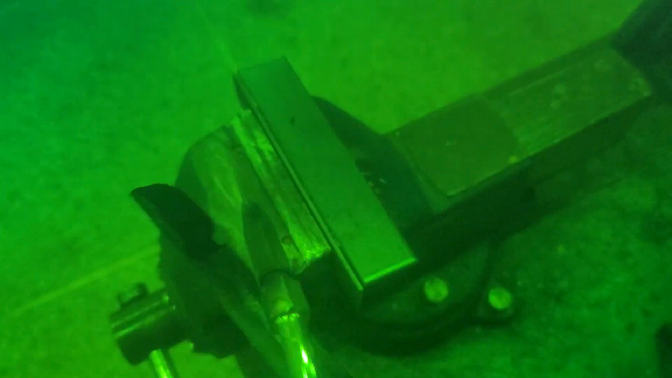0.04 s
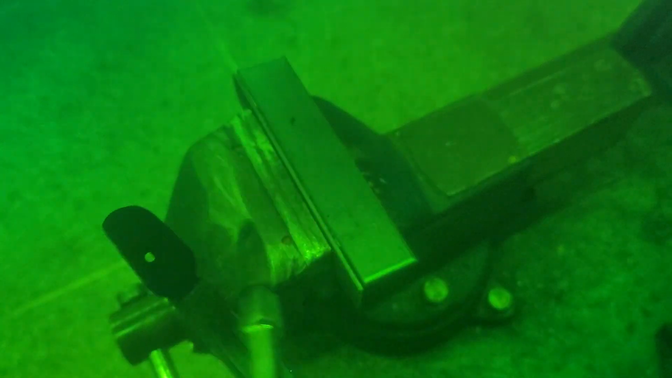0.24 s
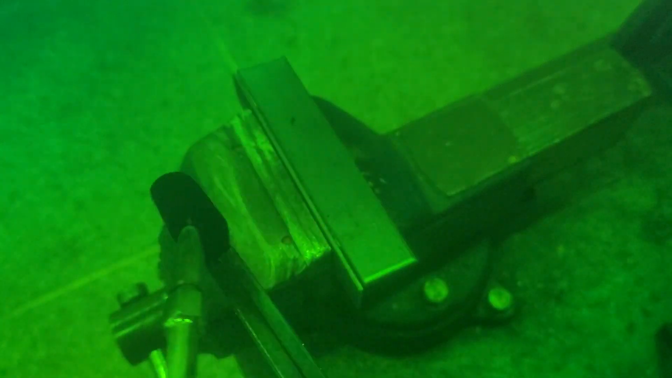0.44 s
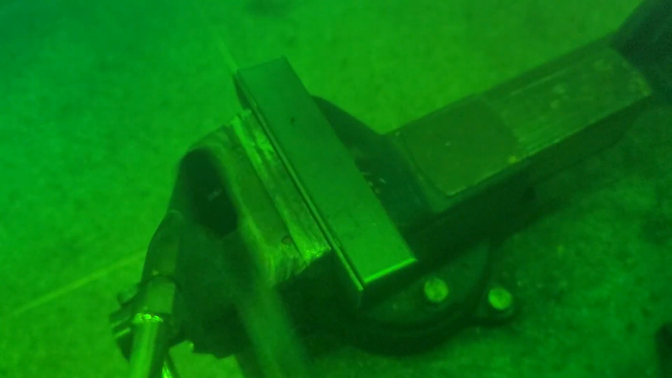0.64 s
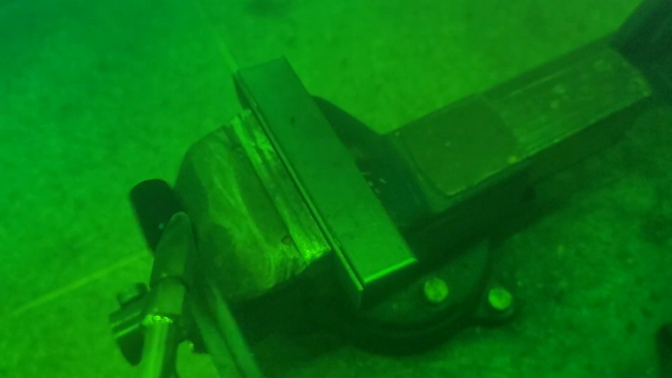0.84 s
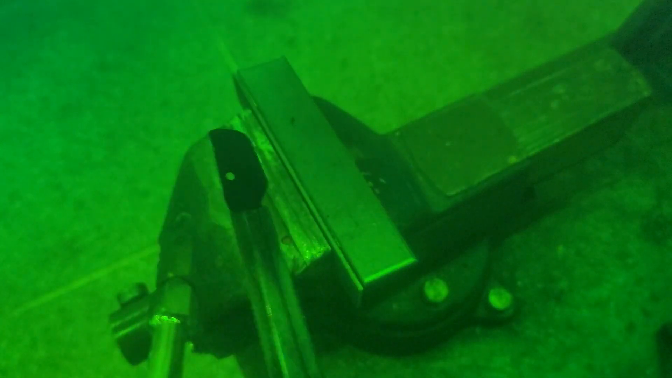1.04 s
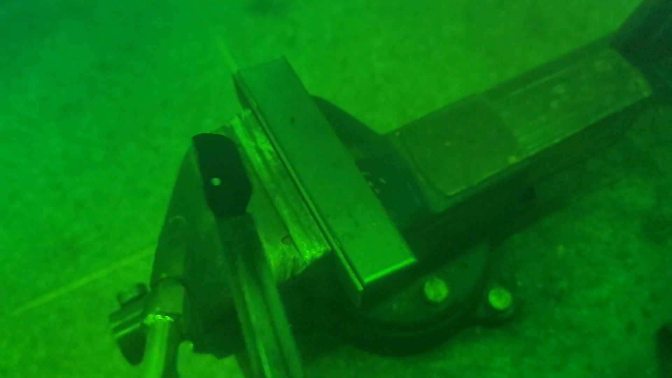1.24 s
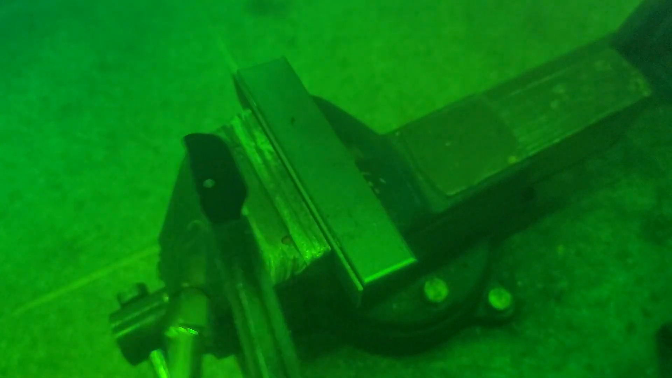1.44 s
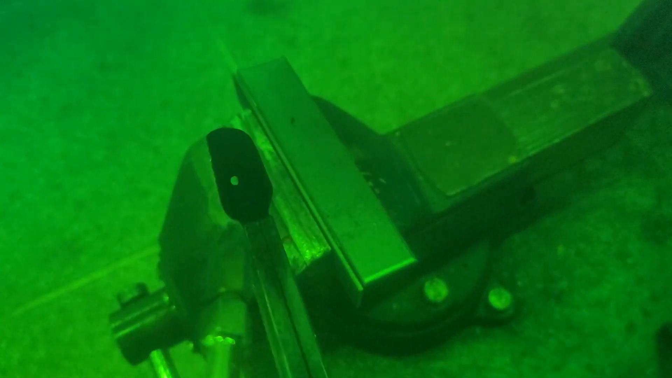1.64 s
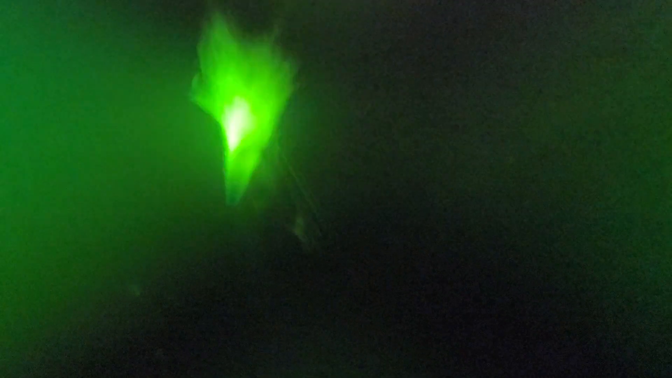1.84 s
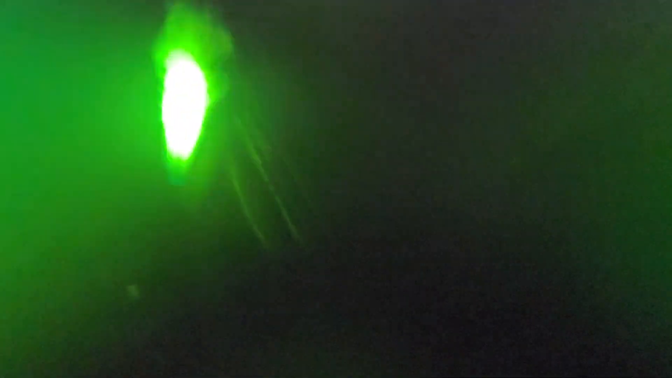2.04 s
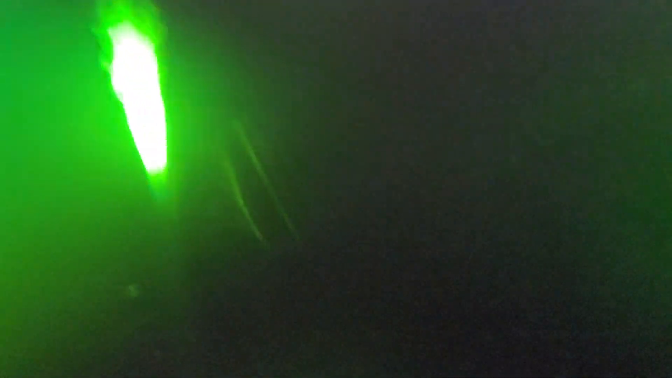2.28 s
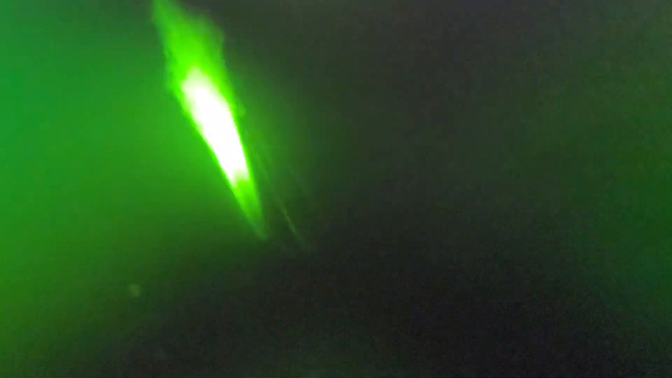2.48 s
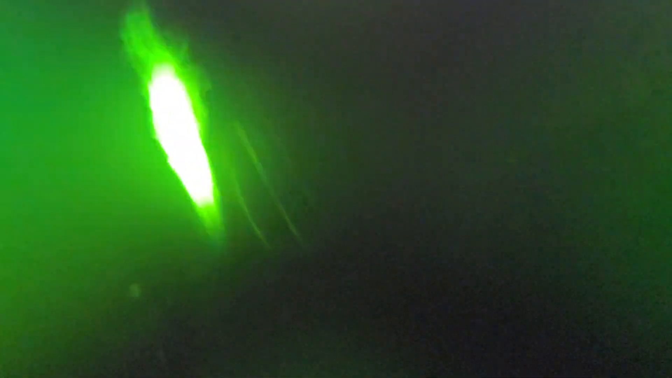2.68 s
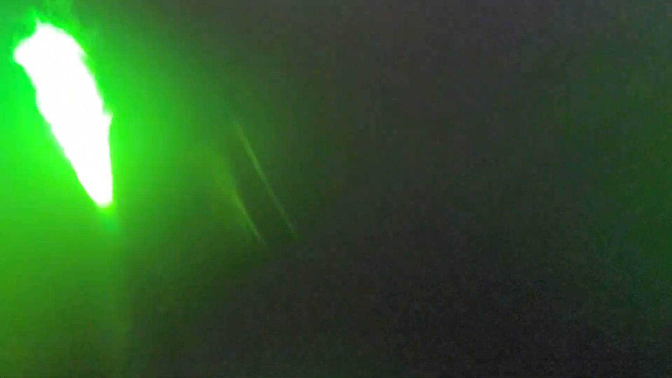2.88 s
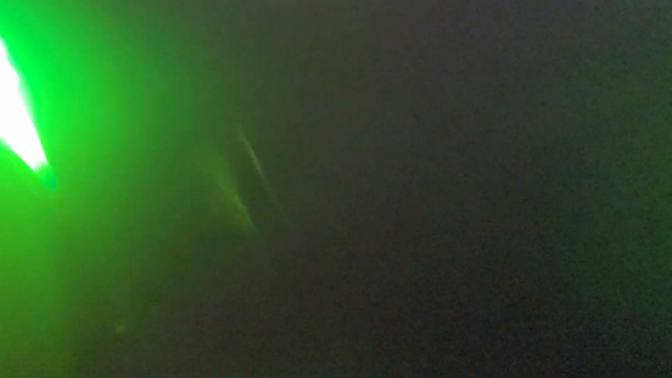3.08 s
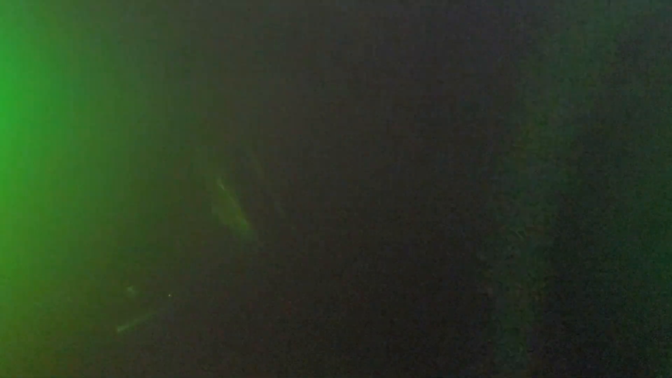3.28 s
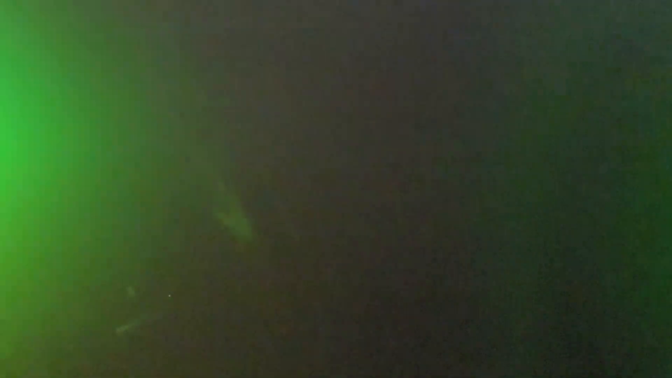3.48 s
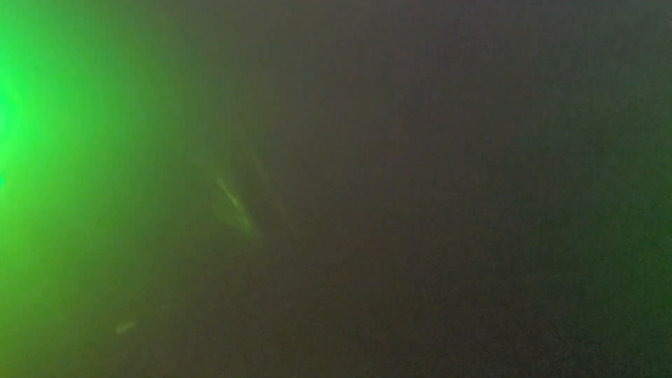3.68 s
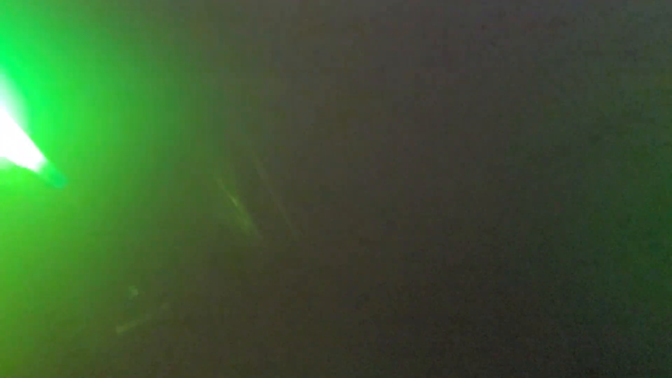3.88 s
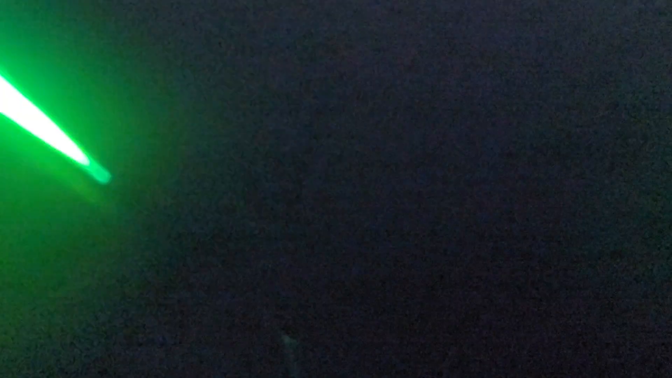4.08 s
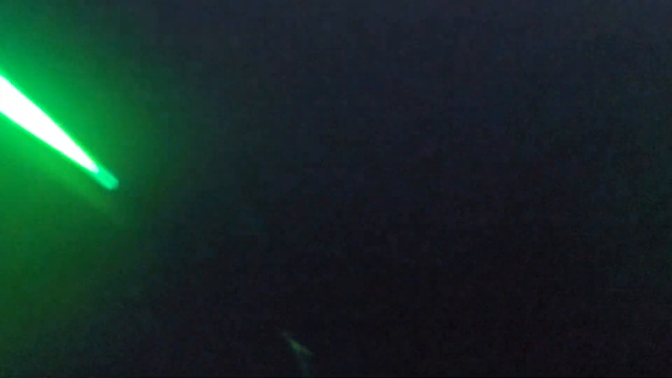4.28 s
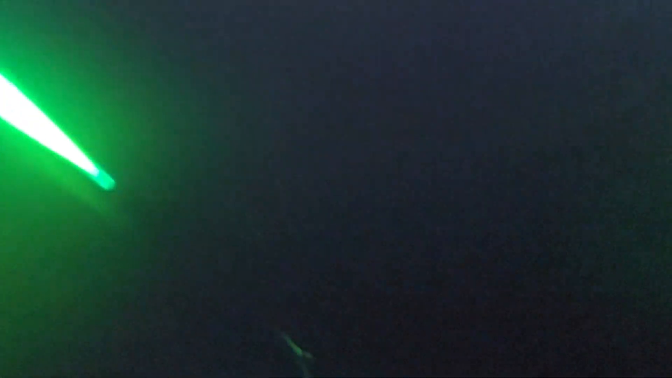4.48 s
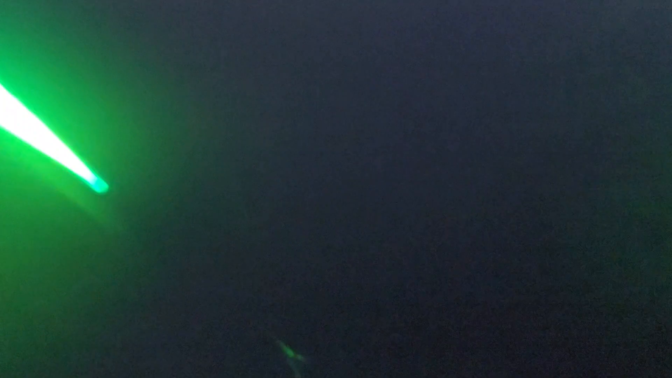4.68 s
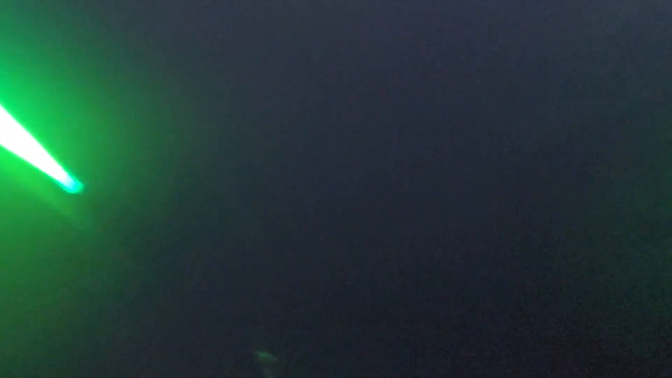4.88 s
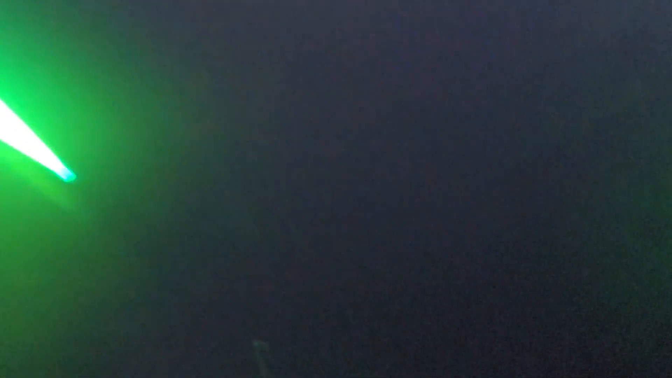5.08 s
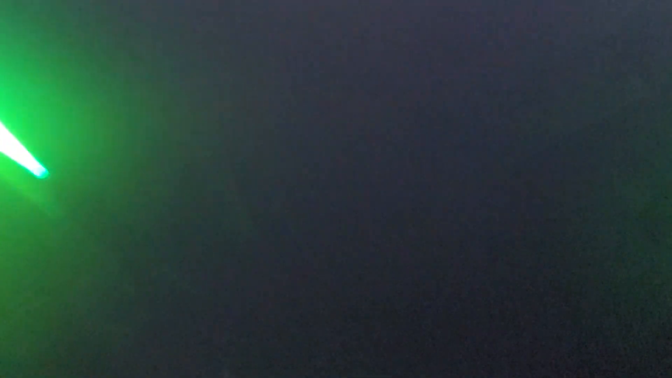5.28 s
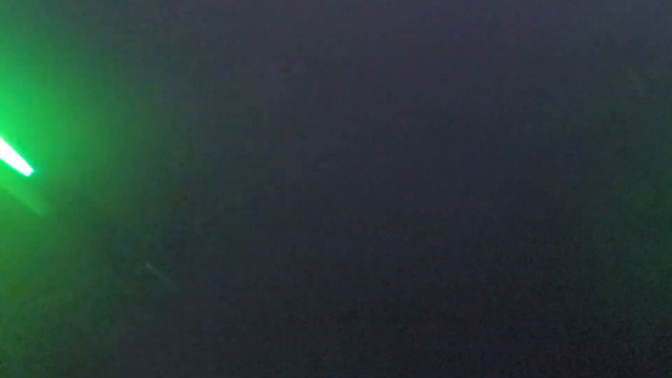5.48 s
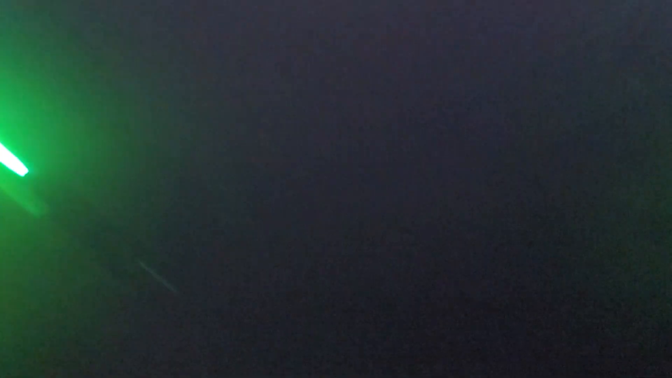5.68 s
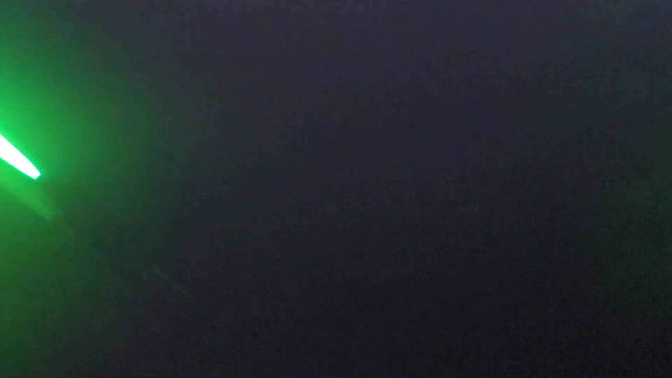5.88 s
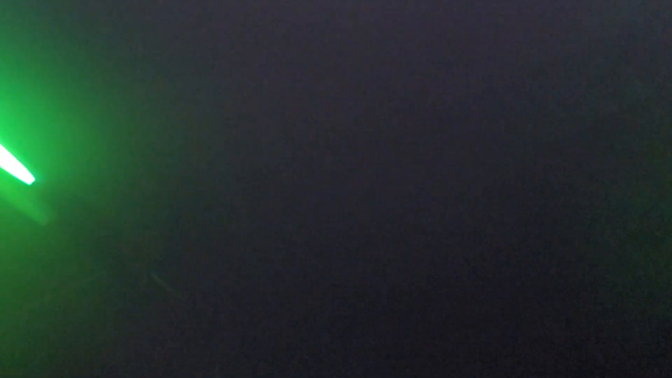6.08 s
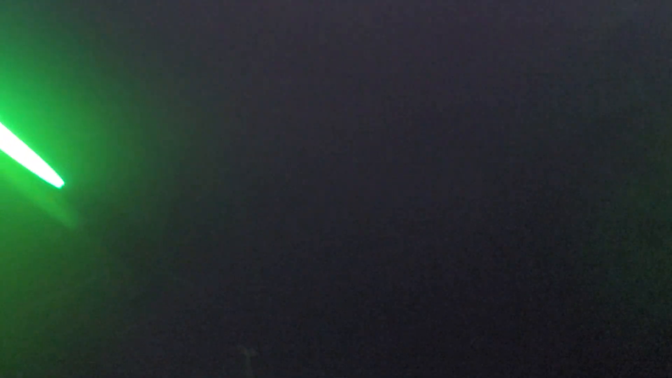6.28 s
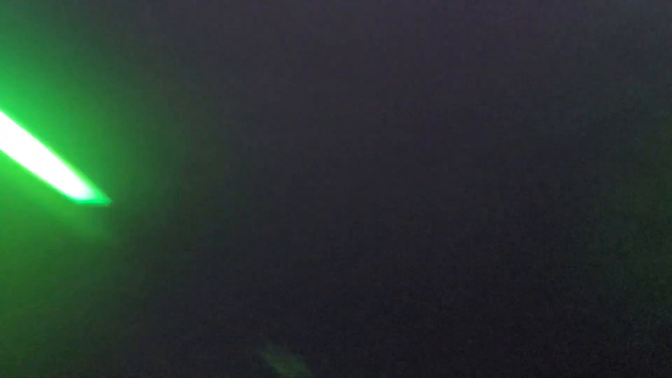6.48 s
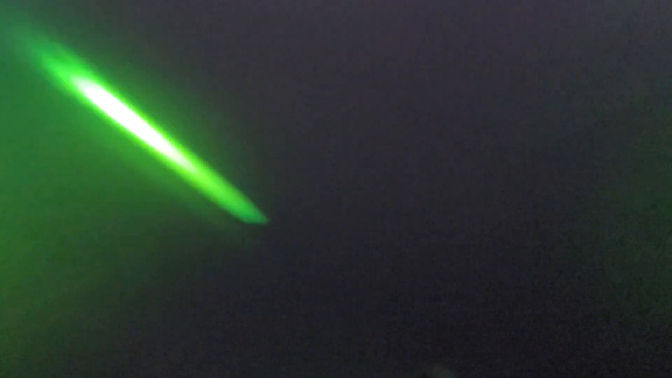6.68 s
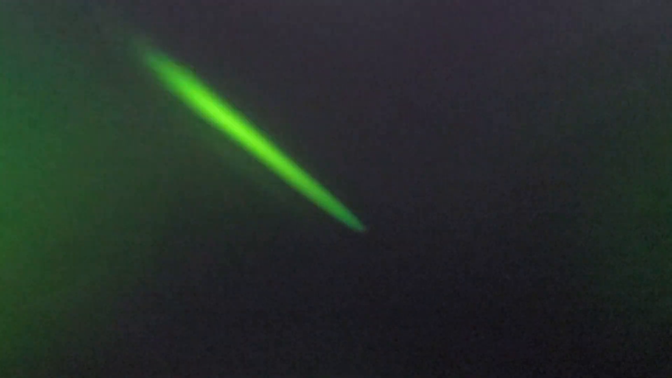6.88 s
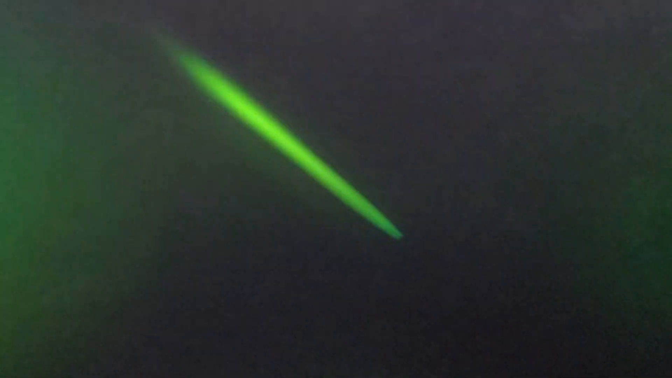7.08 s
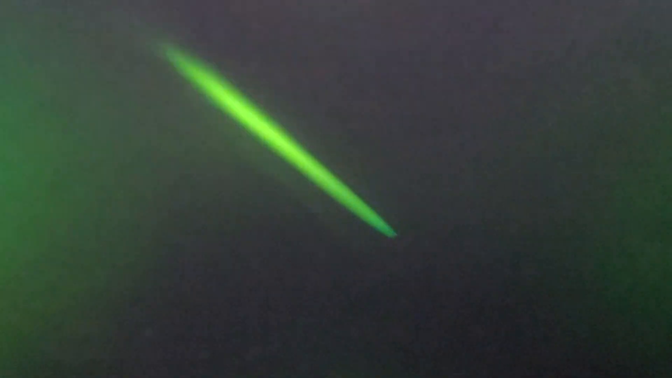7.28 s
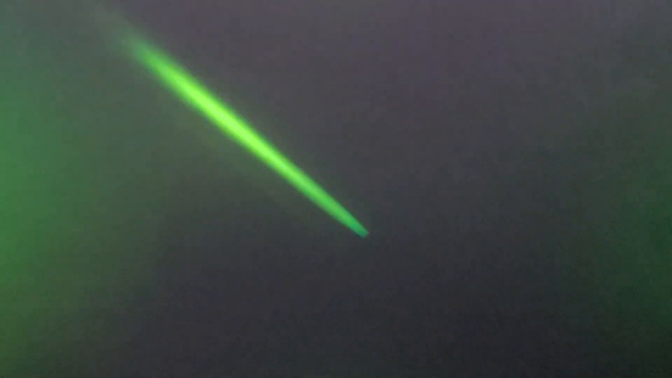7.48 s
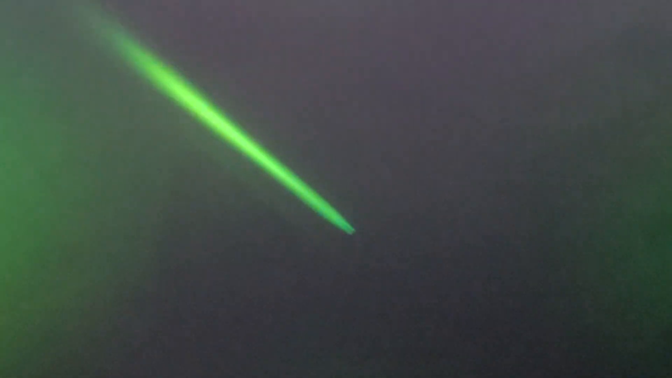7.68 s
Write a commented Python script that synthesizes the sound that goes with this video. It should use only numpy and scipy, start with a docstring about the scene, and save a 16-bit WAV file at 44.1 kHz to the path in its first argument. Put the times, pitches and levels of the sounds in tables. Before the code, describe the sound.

A spark lighter snaps, and a gas welding torch catches with a pop, roars, then turns to a hard hiss as it is adjusted.

```python
"""A spark lighter snaps in a large bare workshop, its modes ringing after each impact. Gas hisses,
catches with a pop and burns with a turbulent roar; oxygen is let in and the roar turns to the hard hiss
of jet noise. The torch wanders on the left of two microphones behind a welding visor, so the right one
lies in an acoustic shadow and hears it later, duller and weaker."""
import sys
import numpy as np
from scipy import signal
from scipy.fft import rfft, irfft, next_fast_len
from scipy.io import wavfile
from scipy.ndimage import uniform_filter1d

SR = 44100
rng = np.random.default_rng(int(sys.argv[2]) if len(sys.argv) > 2 else 0)


def digitize_waveform(pressure):
    """Quantize a signal to 16-bit integers and store it at the path in sys.argv[1].

    Rows of a 2-D input are taken as channels; values are limited to [-1, 1].
    """
    field = np.atleast_2d(pressure).T
    bounded = np.clip(field, -1, 1)
    quanta = np.round(bounded * 32767).astype(np.int16)
    wavfile.write(sys.argv[1], SR, quanta)


N = 340893
HZ = np.fft.rfftfreq(1024, 1 / SR)
IGNITION_S = 1.7753


def flame(rise_s=0.028):
    """Incoherent sources add in power: combustion and jet noise swell up together at ignition."""
    since = np.arange(N) / SR - IGNITION_S
    onset = np.clip((since + 0.0066) / rise_s, 0, 1)
    return from_torch(lambda t: combustion_power(t) + jet_power(t)) * onset


# Spectra of the flame's rumble and roar: (frequency [Hz], density [dB])
RUMBLE_SPECTRUM = [(20, -41), (42, -45), (65, 5), (90, 3), (200, 2.5), (350, -9), (1000, -14),
                   (22050, -85.5)]
ROAR_SPECTRUM = [(20, -63), (150, -12), (300, -4.5), (550, 0), (1700, -2), (3000, -11.5), (8000, -26.5),
                 (16000, -34.5)]
# Envelope of the roar: (time [s], level [dB])
ROAR_ENVELOPE = [(1.8, -16), (1.97, -16), (2.25, -22), (2.75, -20), (3.5, -19.5), (3.9, -17.5),
                 (4.04, -15.5), (4.12, -21), (5.2, -21.5), (5.75, -23.5), (5.95, -19.5), (6.6, -18),
                 (7.73, -18.5)]

def combustion_power(t, settled_db=-33, flare_db=13, flare_s=0.32, wander_db=1.5, flutter_db=1.03):
    """Turbulent combustion: a rumble flares at ignition and settles; the roar flutters as the flame flaps."""
    flare = flare_db * np.exp(-np.maximum(t - IGNITION_S, 0) / flare_s)
    rumble_db = settled_db + flare + wander_db * flicker(t, bins=60, frames=20)
    roar_db = at_times(ROAR_ENVELOPE, t)[0] + flutter_db * flicker(t, bins=60, frames=3)
    rumble = colour(RUMBLE_SPECTRUM) * amp(rumble_db)
    roar = colour(ROAR_SPECTRUM) * amp(roar_db)
    return rumble ** 2 + roar ** 2


# Envelope of the fuel jet: (time [s], level [dB])
FUEL_ENVELOPE = [(1.85, -50), (1.95, -39), (2.4, -38.5), (2.6, -34.5), (3.3, -32), (4, -32), (5.7, -38),
                 (6.6, -33), (7.2, -27), (7.73, -33)]
# Oxygen flow as the valve is worked: (time [s], jet level [dB], jet peak [Hz], fizz level [dB])
OXYGEN_FLOW = [(2.4, -60, 710, -65), (3.35, -60, 700, -46), (3.85, -38, 710, -52), (3.97, -20, 1010, -32),
               (4.03, -15, 1680, -26), (4.07, -10, 2670, -25), (4.12, -10.5, 4000, -19),
               (4.3, -11, 4340, -32), (5.05, -11.5, 4700, -27), (5.2, -13.5, 4800, -26),
               (5.38, -11.5, 4700, -26), (5.47, -19.5, 5100, -16), (5.6, -27, 4800, -14),
               (5.74, -35, 5200, -16), (5.77, -36, 5400, -23.5), (6.05, -40, 5640, -19),
               (6.65, -24, 5600, -18.5), (7.73, -45, 5000, -17.5)]
# Spectrum of the fizz: (frequency [Hz], density [dB])
FIZZ_SPECTRUM = [(20, -80), (2000, -13.5), (5000, -4.5), (8000, 0), (11000, 0), (16000, -1.5)]

def jet_power(t, fuel_hz=3800, patchy_db=1.4):
    """Jet noise peaks higher the faster the flow: the fuel's peak stays, the oxygen's moves under a fizz."""
    fuel_db, = at_times(FUEL_ENVELOPE, t)
    oxygen_db, oxygen_hz, fizz_db = at_times(OXYGEN_FLOW, t)
    jets = np.hypot(hump(fuel_hz) * amp(fuel_db), hump(oxygen_hz) * amp(oxygen_db))
    jets *= amp(patchy_db * flicker(t, bins=12, frames=8))
    fizz = colour(FIZZ_SPECTRUM) * amp(fizz_db + patchy_db * flicker(t, bins=30, frames=4))
    return jets ** 2 + fizz ** 2


def pop(gain_db=-2, swing_hz=460):
    """Ignition transient of the gas cloud: a low swell, a quick rarefaction, one sharp pressure swing."""
    t = np.arange(N) / SR - IGNITION_S
    ahead = np.clip(t + 0.0042, -.1, .1)
    swell = 0.22 * np.exp(-abs(ahead) / np.where(ahead < 0, .005, .0012))
    swell *= np.cos(2 * np.pi * 90 * ahead)
    rarefaction = -.7 * np.exp(-((t + .0001) / 0.00016) ** 2)
    after = np.maximum(t, 0)
    swing = np.sin(2 * np.pi * swing_hz * after) * np.exp(-(after / 0.0013) ** 2 / 2)
    return amp(gain_db) * (swell + rarefaction + swing) * pan(2)


# Spectrum of the unlit gas: (frequency [Hz], density [dB])
GAS_SPECTRUM = [(120, -61), (200, -34), (803, -9.5), (946, -9.5), (1200, -4), (1310, -5), (1470, -3),
                (2110, -7), (6570, -16.5), (8490, -22), (15800, -29)]
# Its envelope: (time [s], level [dB])
GAS_ENVELOPE = [(1.25, -64), (1.4, -51), (1.48, -43), (1.55, -45.5), (1.65, -45.5), (1.7, -39.5),
                (1.76, -44), (1.8, -45.5)]

def unlit_gas():
    """Turbulent outflow: gas hisses from the tip until it catches."""
    hiss = from_torch(lambda t: (colour(GAS_SPECTRUM) * amp(at_times(GAS_ENVELOPE, t)[0])) ** 2)
    t = np.arange(N) / SR
    return hiss * (t > GAS_ENVELOPE[0][0]) * (t < GAS_ENVELOPE[-1][0])


# Snaps of lighter and handle: (time [s], energy [dB], left minus right [dB], tilt [dB/octave],
# share sent to the room [dB], mode of the struck part [Hz], its level before tilt [dB])
IMPACTS = [(-.04, 3, 0, -1, -1.5, 3280, 2), (0.0529, 3, 0, -3.5, -7.5, 960, -2.5),
           (0.3664, -7, -1, 4, -4.5, 2370, 12), (.391, -18, -1, -8, -1, 4000, 0),
           (.646, -27, -1, -11, 1, 1200, -2), (.876, -23, 0, -11, -10, 1060, 1.5),
           (1.0755, -25, 0, 1, -4, 1000, 0), (1.0883, -26, 1, 2, -5, 1000, 0),
           (1.1037, -21, -5, 2, 1, 1900, 0), (1.130, 6.5, -4, 2, -3, 890, 1),
           (1.3063, 4, 1, 2, -11, 1390, 11), (1.383, -22, 4, -7.5, -9, 900, 4),
           (1.752, -21, -2, 1, -3, 3700, 0), (1.7723, 5, -9, 0, -7, 1190, 2),
           (1.969, -1.5, -6, -0.5, 0, 6740, 0), (2.7856, 0.5, -10, -1, 1, 1820, 10)]
# A glove or the flint rubbing: (time [s], duration [s], level [dB], nominal band centre [Hz])
RUBS = [(.335, .03, -64.5, 11000), (0.444, 0.058, -46.5, 5500), (0.576, 0.022, -62, 950),
        (0.647, 0.035, -51.5, 1900), (.65, .035, -67, 8000), (.735, 0.053, -62, 5000),
        (1.473, .05, -54, 9000)]

def handling(lead_s=1):
    """Impact and friction: snaps excite the room, scuffs stay dry. A lead-in holds the earliest snap."""
    direct, to_room = np.zeros((2, 2, N + lead_s * SR))
    for s, db, pan_db, tilt_db, room_db, struck_hz, struck_db in IMPACTS:
        ring = lighter_ring(tilt_db, struck_hz, struck_db)
        add(direct, s + lead_s, amp(db) * pan(pan_db) * snap(ring))
        add(to_room, s + lead_s, amp(db + room_db) * np.array([ring, ring]))
    for s, duration_s, db, hz in RUBS:
        add(direct, s + lead_s, amp(db) * scuff(duration_s, hz))
    return (direct + workshop(to_room)[:, :direct.shape[1]])[:, lead_s * SR:]


def snap(ring, fall_20db_s=0.0064):
    """Convolution: one hard blow and a burst of tiny impacts each set off the same ring."""
    t = np.arange(len(ring)) / SR
    envelope = np.minimum(t / 0.00093, 1) * amp(-20 * (t / fall_20db_s) ** 2)
    burst = rng.standard_normal((2, len(t))) * envelope
    burst[1] = .6 * burst[0] + .8 * burst[1]  # partly coherent channels
    burst[:, 40] += 2.5  # the hard blow
    return unit_energy(signal.fftconvolve(burst, ring[None], axes=1)[:, :len(t)])


# Modes of the lighter: (frequency [Hz], bandwidth [Hz], level before tilt [dB])
LIGHTER_MODES = [(1090, 280, -12), (1695, 310, 14.5), (2430, 740, 0), (3360, 420, 3.5), (3820, 240, 6),
                 (4470, 320, 2.5), (5740, 1130, 2.5), (7000, 870, -0.5), (10800, 930, -5.5),
                 (13800, 1600, -12)]

def lighter_ring(tilt_db, struck_hz, struck_db, low_hz=800):
    """Damped modes: a small body radiates little bass, and a soft blow excites little treble."""
    t = np.arange(900) / SR
    modes = np.zeros(len(t))
    for hz, width, db in LIGHTER_MODES + [(struck_hz, 300, struck_db)]:
        gain = amp(db + tilt_db * np.log2(hz / 1700)) * width
        modes += gain * np.exp(-np.pi * width * t) * np.sin(2 * np.pi * hz * t)
    high_hz = np.clip(30000 * 2 ** (tilt_db / 4.5), 2 * low_hz, SR / 2.1)
    return unit_energy(filtered(modes, 4, [low_hz, high_hz], "bandpass"))


def scuff(duration_s, hz):
    """Sliding friction gives a short, soft-edged band of noise."""
    count = round(duration_s * SR)
    band_hz = [hz / 1.8, min(hz * 1.34, SR / 2.1)]
    rub = filtered(rng.standard_normal((2, 4410)), 2, band_hz, "bandpass")[:, :count]
    return rub / rub.std() * signal.windows.tukey(count, .6)


# Path difference as the torch wanders: (time [s], lag of the right microphone [ms])
RIGHT_LAG = [(1.8, 0.14), (2.2, 0.22), (2.4, 0.186), (2.55, 0.12), (2.76, 0.18), (3.0, 0.259), (3.12, 0.25),
             (3.36, 0.38), (3.6, 0.3), (4.08, 0.24), (4.4, 0.2355), (6.0, 0.282), (6.52, 0.26),
             (6.72, 0.1795), (6.88, 0.11), (7.2, 0.059), (7.73, 0.11)]
# Depth of the shadow: (time [s], factor on base loss and phase delay [1])
SHADOW_DEPTH = [(1.5, 0.76), (3.1, 0.82), (4.2, 1.01), (6.5, 0.93), (7.73, 1.1)]
# Shadow on the right: (frequency [Hz], base loss [dB], loss per lag [dB/ms], phase delay [rad],
# coherence with the left [0-1])
SHADOW = [(40, -0.5, -10, 2, 1), (130, 1.5, 4.5, -0.58, 0.87), (228, 0, 12.5, 0.51, 0.91),
          (378, 2.5, 12.5, 0.87, 0.97), (876, 10, -23.5, 1.09, 0.92), (1310, 8, 4, 0.12, 0.96),
          (2234, 9, -15.5, 0.45, 0.98), (4150, 2, 22, 0.37, 0.77), (6670, -2, 12, 0.4, 0.72),
          (8460, 3, 21, 2.5, 0.6), (10900, -3, 26, -0.6, 0.66), (16040, 2, 20, 0.27, 0.8)]

def from_torch(power):
    """Acoustic shadow: noise of power(t) per bin reaches the right side late, dull and partly coherent."""
    t, (left, independent) = white_spectra()
    (lag_ms,), (depth,) = at_times(RIGHT_LAG, t), at_times(SHADOW_DEPTH, t)
    loss_db, db_per_ms, phase, coherence = at_bins(SHADOW)[:, :, None]
    right = coherence * left + np.sqrt(1 - coherence ** 2) * independent
    right *= amp(-depth * loss_db - db_per_ms * lag_ms)
    right *= np.exp(-1j * (depth * phase + 2 * np.pi * HZ[:, None] * lag_ms / 1000))
    return to_samples(np.sqrt(power(t)) * np.array([left, right]))


# Dips and peaks of the visor: (frequency [Hz], bandwidth [Hz], left gain [dB], right gain [dB])
VISOR_BANDS = [(1004, 187, -8.5, -10), (1404, 78, -7.5, -3.5), (2155, 1030, -10.5, -4),
               (3390, 220, -8.5, 1.5), (4580, 760, -3.5, 0.5), (7870, 420, 0, 0)]
# Reflections inside it: (delay [ms], left amplitude [1], right amplitude [1])
VISOR_REFLECTIONS = [(.66, .06, .06), (.86, -0.027, 0.058), (1.68, -0.0021, 0.043), (1.84, 0.039, 0.017),
                     (2.9, 0.096, -0.055), (6.4, 0.11, -0.0026)]

def visor(x):
    """Interference: the shell round the microphones adds spectral dips and short echoes."""
    size = next_fast_len(N + 1024)
    hz = np.fft.rfftfreq(size, 1 / SR)
    bands_db = sum(np.outer(db, 1 / (1 + (2 * (hz - f) / width) ** 2)) for f, width, *db in VISOR_BANDS)
    echoes = sum(np.outer(share, np.exp(-2j * np.pi * hz * ms / 1000))
                 for ms, *share in VISOR_REFLECTIONS)
    return irfft(rfft(x, size) * amp(bands_db) * (1 + echoes), size)[:, :N]


def bench(x, share=0.33, t60_s=0.05):
    """Early reflections: bench and vice return sparse echoes, different on each side."""
    t = np.arange(1300) / SR
    taps = rng.standard_normal((2, len(t))) * (rng.random((2, len(t))) < .06)
    taps *= amp(-60 * t / t60_s) * (t > .0015)
    taps = filtered(taps, 1, 2200, "highpass")
    return x + share * signal.oaconvolve(x, unit_energy(taps), axes=1)[:, :N]


# Spectrum of the reverberation: (frequency [Hz], level [dB])
REVERB_SPECTRUM = [(300, -33), (650, -9), (850, -4.5), (1500, -6.5), (2500, -0.5), (4000, 0.5), (7300, -2),
                   (8300, -0.5), (12000, 1.5), (16000, -1)]
# Reverberation time: (frequency [Hz], time to fall 60 dB [s])
REVERB_TIME = [(400, 0.57), (1500, 1.78), (4000, 1.26), (7500, 0.85), (9000, 0.59), (16000, 0.39)]

def workshop(x, early_t60_s=0.1, near_db=-5, wall_s=0.018, wall_db=9.5):
    """Reverberation: faint near echoes, a slap from one wall, then a tail whose midrange lasts longest."""
    count = 2 * SR
    t, noise = white_spectra(count)
    decay = amp(-60 * t / at_bins(REVERB_TIME)[:, None]) + amp(-60 * t / early_t60_s)
    tail = to_samples(noise * amp(at_bins(REVERB_SPECTRUM))[:, None] * decay, count)
    since_wall = np.arange(count) / SR - wall_s
    onset = np.clip(since_wall / 0.0019, amp(near_db), 1)
    slap = amp(wall_db * np.exp(-(since_wall / 0.0026) ** 2))
    return signal.fftconvolve(x, unit_energy(tail * onset * slap), axes=1)


# Spectrum of the background: (frequency [Hz], density [dB])
FLOOR_SPECTRUM = [(18, -53), (30, -14.5), (69, 0), (169, -27), (226, -13), (294, -26), (424, -15.5),
                  (509, -21), (1420, -20), (15800, -49)]

def noise_floor(left_db=-69, right_db=-65):
    """Stationary noise: the quiet workshop and the hiss of the microphones."""
    return amp([[left_db], [right_db]]) * to_samples(white_spectra()[1] * colour(FLOOR_SPECTRUM))


def amp(db):
    """Decibels to amplitude ratio."""
    return 10 ** (np.asarray(db) / 20)


def pan(db):
    """Stereo gains for a level difference, left minus right."""
    return amp([[db / 2], [-db / 2]])


def at_bins(table):
    """Columns of a spectrum table, interpolated in log frequency."""
    hz, *columns = np.transpose(table)
    return np.squeeze([np.interp(np.log(HZ + 1), np.log(hz + 1), c) for c in columns])


def at_times(table, t):
    """Columns of a time table, interpolated at t."""
    s, *columns = np.transpose(table)
    return [np.interp(t, s, c) for c in columns]


def unit_power(gain):
    """Spectral gain scaled to conserve the power of white noise."""
    return gain / np.sqrt(np.mean(gain ** 2, axis=0))


def unit_energy(x):
    """Energy 1 in each channel."""
    return x / np.linalg.norm(x, axis=-1, keepdims=True)


def colour(table):
    """A spectrum table as unit-power gains."""
    return unit_power(amp(at_bins(table)))[:, None]


def hump(peak_hz, octave_drop_db=3.5):
    """A broad spectral peak, parabolic in dB over log frequency."""
    octaves = np.log2((HZ[:, None] + 1) / peak_hz)
    return unit_power(amp(np.maximum(-octave_drop_db * octaves ** 2, -80)))


def flicker(t, bins, frames):
    """Random patches over frequency and time, of unit variance."""
    field = rng.standard_normal((len(HZ), len(t)))
    field = uniform_filter1d(uniform_filter1d(field, bins, 0), frames, 1)
    return field / field.std()


def white_spectra(count=N):
    """Frame times and short-time spectra of two independent white noises."""
    return signal.stft(rng.standard_normal((2, count)), SR, nperseg=1024, noverlap=768)[1:]


def to_samples(spectra, count=N):
    """Overlap-add synthesis from short-time spectra."""
    return signal.istft(spectra, SR, nperseg=1024, noverlap=768)[1][:, :count]


def filtered(x, order, hz, kind):
    """Maximally flat filtering."""
    return signal.sosfilt(signal.butter(order, hz, kind, fs=SR, output="sos"), x)


def add(mix, s, part):
    """Superposes part on mix from time s."""
    here = mix[:, round(s * SR):][:, :part.shape[1]]
    here += part[:, :here.shape[1]]


def scene():
    """Superposition of torch, lighter and background."""
    return visor(bench(flame())) + bench(unlit_gas()) + pop() + handling() + noise_floor()


def record(dry, cutoff_hz=15850):
    """Clipping at full scale, then a low-pass band limit."""
    lowpass = signal.firwin(511, cutoff_hz, window=("kaiser", 9), fs=SR)
    return signal.oaconvolve(np.clip(dry, -1, 1), lowpass[None], "same", axes=1)


dry = scene()
out = record(dry)
digitize_waveform(out)
```